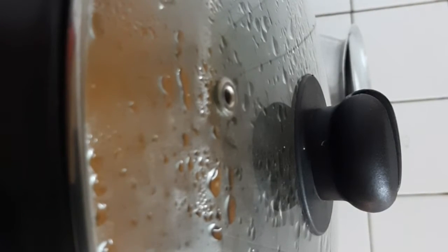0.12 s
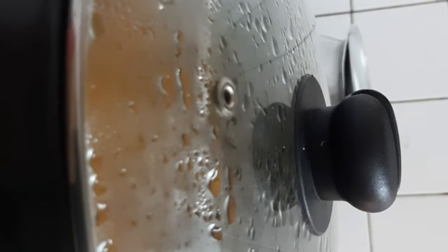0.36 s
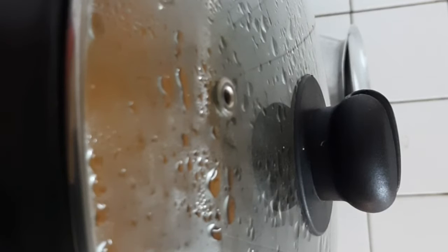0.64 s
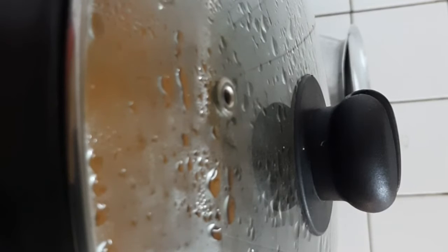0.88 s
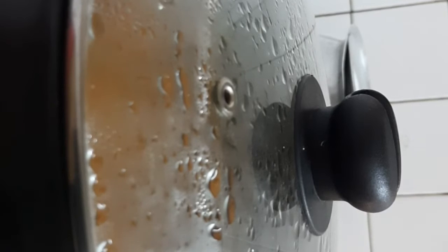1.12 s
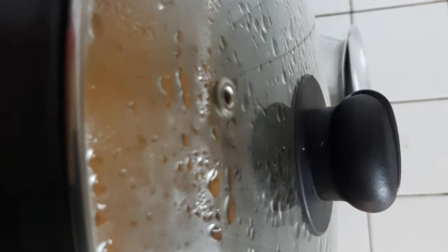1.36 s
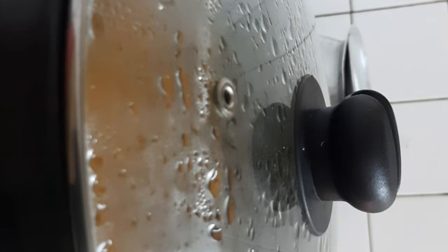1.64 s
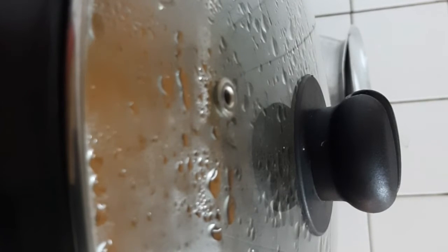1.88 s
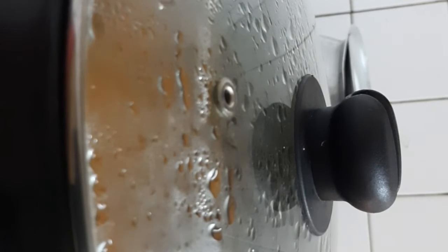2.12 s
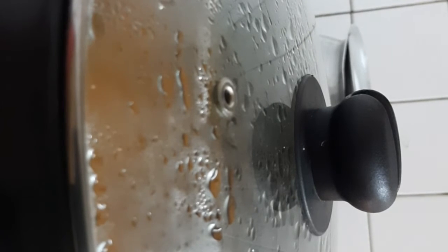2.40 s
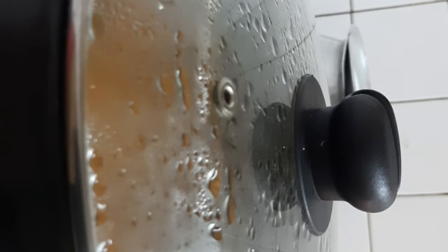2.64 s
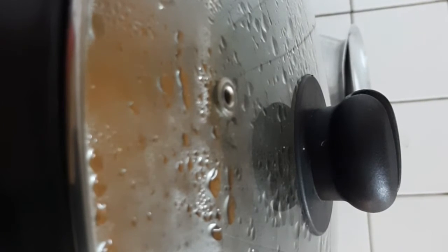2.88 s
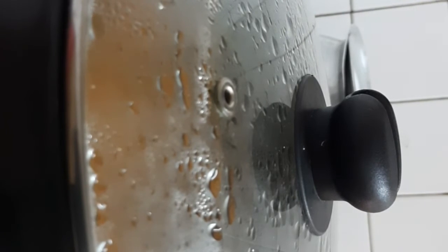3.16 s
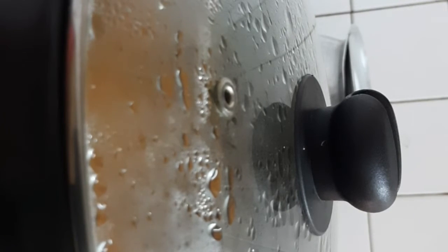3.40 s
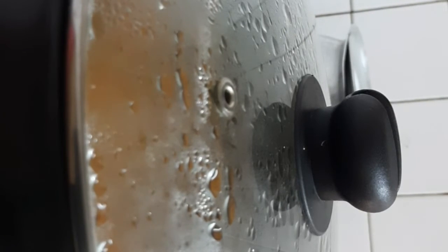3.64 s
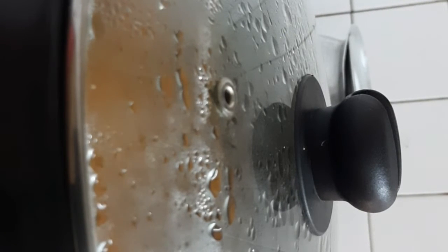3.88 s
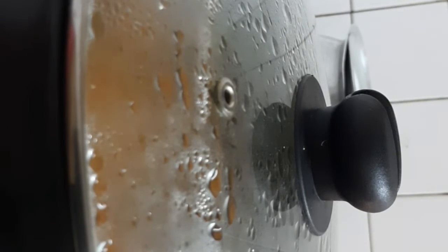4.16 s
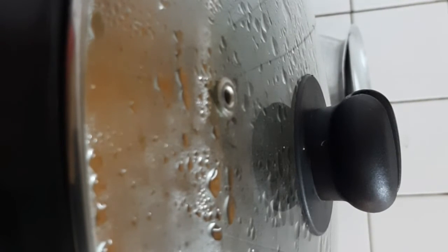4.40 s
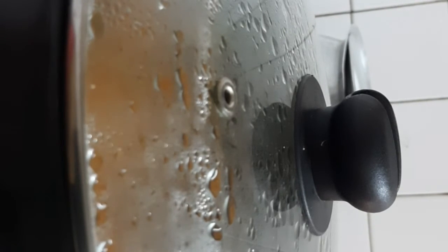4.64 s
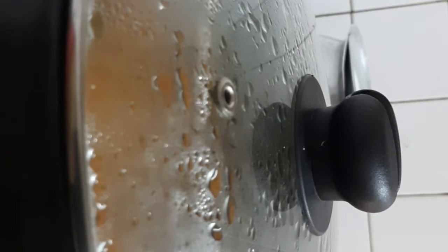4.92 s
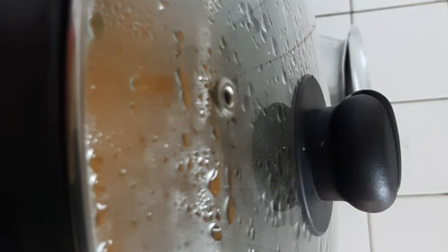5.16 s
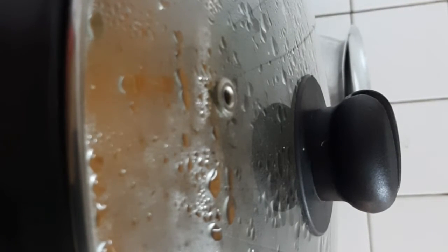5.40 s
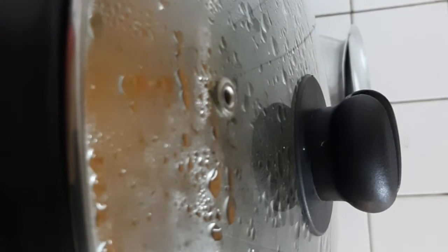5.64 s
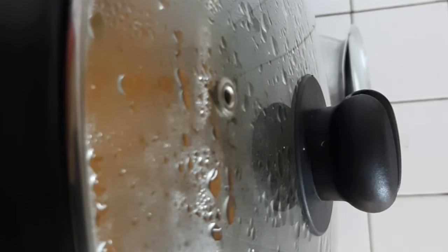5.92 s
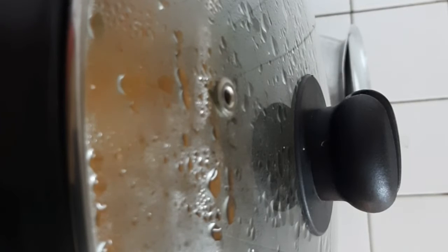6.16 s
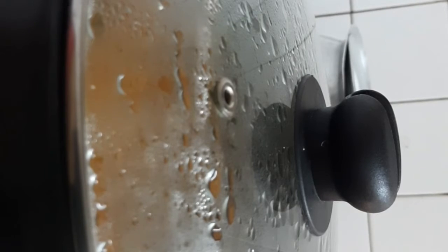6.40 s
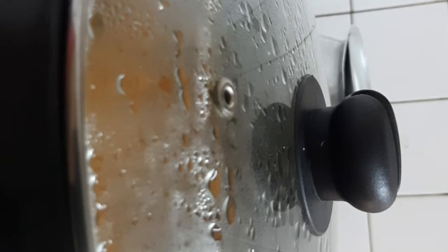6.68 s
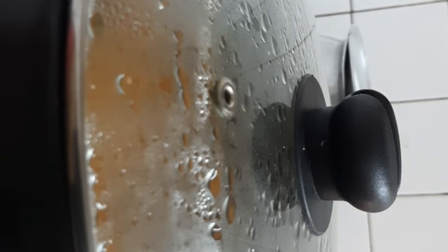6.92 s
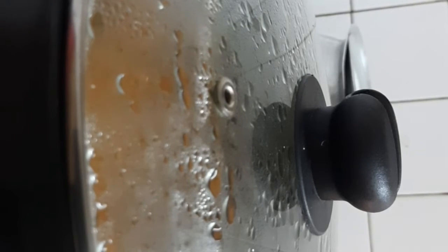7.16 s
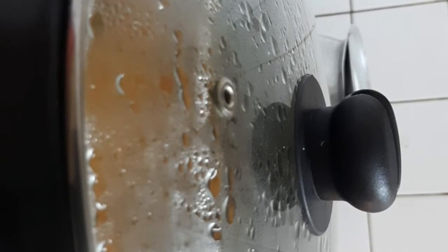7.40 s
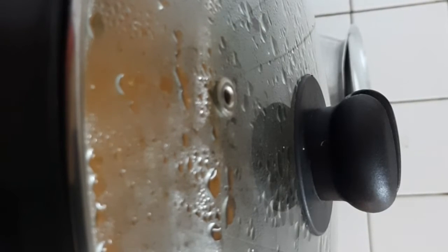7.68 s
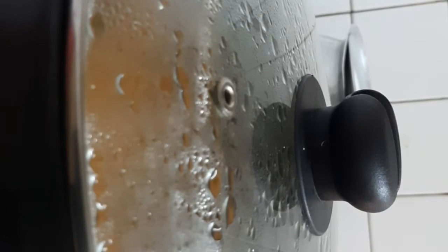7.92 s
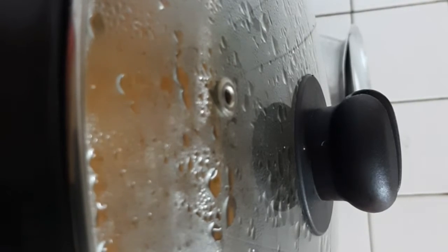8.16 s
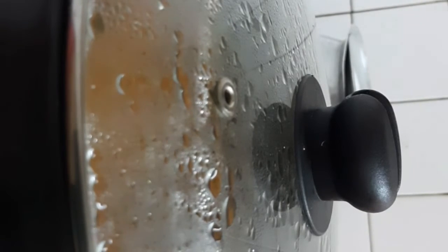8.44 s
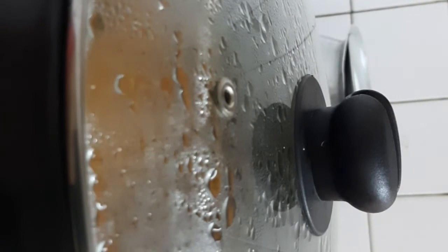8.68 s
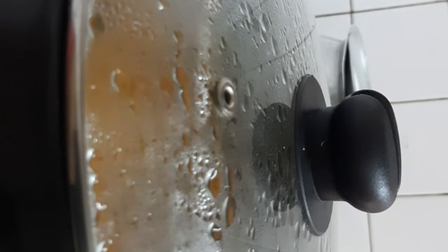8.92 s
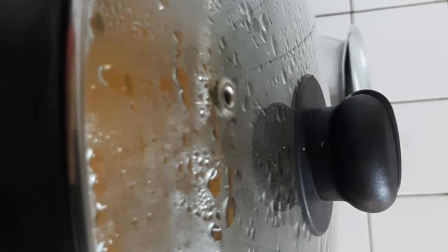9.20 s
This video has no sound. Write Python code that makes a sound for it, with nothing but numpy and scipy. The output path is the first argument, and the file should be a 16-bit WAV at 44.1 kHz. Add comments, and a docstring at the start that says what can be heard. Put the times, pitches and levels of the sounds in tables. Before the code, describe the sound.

Thick liquid bubbles softly under a glass lid in a humming kitchen; nearby cloth rustles lightly, and sharp little ticks and a knock come midway.

```python
"""A covered pan simmers on a stove in a small hard kitchen.
From the start appliances hum in wavering sines, noise rumbles in room and pan resonances, and the
simmer, coloured noise plus ringing bubbles, hushes under the glass lid over a faint microphone hiss.
After a second cloth close to the microphones rustles in swells of noise, pauses, and resumes past four.
Small ticks, filtered noise bursts, are thickest just around and after five seconds; two knocks ring."""
import sys
import numpy as np
from scipy import signal
from scipy.fft import rfft, irfft, next_fast_len
from scipy.io import wavfile

SR = 44100
rng = np.random.default_rng(int(sys.argv[2]) if len(sys.argv) > 2 else 0)


def materialize(psi):
    """Save the field psi as 16-bit PCM at rate SR to the path in sys.argv[1].

    A 1-D psi becomes a single channel; in a 2-D psi each row is a channel.
    """
    bounded = np.clip(np.atleast_2d(psi).T, -1, 1)
    quanta = np.round(bounded * 32767).astype(np.int16)
    wavfile.write(sys.argv[1], SR, quanta)


def magnitude_from_level(level_db):
    """Linear magnitude for a level in decibels (20 dB per decade)."""
    exponent = np.asarray(level_db, float) / 20
    return 10 ** exponent


N = 410571

# Colour of the simmer under the lid, for bed and bubbles. Each row: frequency in Hz, relative dB per Hz.
SIMMER_COLOUR = [(20, -26.5), (60, -2), (150, -10.5), (300, -19.5), (450, -20), (700, -21.5), (1000, -31),
                 (1500, -43.5), (1900, -44), (2600, -48.5), (3200, -57.5), (5000, -65), (16000, -85.5)]


def rms_one(x):
    """Scale to unit rms."""
    return x / np.sqrt(np.mean(x ** 2) + 1e-20)


def in_time(rows):
    """Columns of a table keyed by seconds, interpolated to every sample."""
    s, *columns = np.transpose(rows)
    return [np.interp(np.arange(N) / SR, s, c) for c in columns]


def at_hz(points, hz):
    """Spectrum points interpolated over log frequency."""
    point_hz, value = np.array(points).T
    return np.interp(np.log(hz), np.log(point_hz), value)


def drift(rate_hz):
    """Slow chance with spread 1: noise through a double pole at rate_hz, run every 40 samples."""
    hop, settle = 40, 4000
    r = np.exp(-2 * np.pi * rate_hz * hop / SR)
    noise = rng.standard_normal(N // hop + settle + 2)
    slow = signal.lfilter([1], [1, -2 * r, r * r], noise)[settle:]
    return np.interp(np.arange(N) / hop, np.arange(len(slow)), rms_one(slow - slow.mean()))


def sides(pan_db):
    """Left and right gains for a left-right difference."""
    return magnitude_from_level(np.array([pan_db, -pan_db]) / 2)


def room_noise(gain_at):
    """Stereo noise of a given colour, alike in the bass, nearly unrelated in the treble."""
    # Likeness of the ports. Each row: frequency in Hz, left-right correlation.
    likeness = [(60, 1), (99, 1), (160, 0.95), (270, 0.84), (450, 0.88), (740, -0.1), (1220, -0.021),
                (2010, 0.056), (3330, -0.034), (5500, -0.17), (9080, -0.036), (15000, -0.087)]
    # Tilt between the ports. Each row: frequency in Hz, left-right difference in dB.
    lean = [(60, -0.5), (92, 4.5), (140, -3.5), (210, 2), (330, 2), (500, -10.5), (770, 4), (1170, 0),
            (1790, -0.5), (2740, 2), (4190, -0.5), (6410, 1.5), (9810, -2.5), (15000, 5)]
    top_hz = 15740
    size = next_fast_len(N)
    hz = np.maximum(np.arange(size // 2 + 1) * SR / size, 1)
    mid, side = rfft(rng.standard_normal((2, size)))
    alike = np.clip(at_hz(likeness, hz), -1, 1)
    pair = np.sqrt(1 + alike) * mid + np.sqrt(1 - alike) * side * [[1], [-1]]
    gain = sides(at_hz(lean, hz)) * gain_at(hz) * (hz < top_hz)
    return irfft(pair * gain, size)[:, :N]


def patchy(x, depth_db, rate_hz):
    """Quarter-octave bands from 1 to 16 kHz, and all below and above, flicker separately at each port."""
    pad, size = 4096, next_fast_len(N + 8192)
    # mirrored ends keep the edges quiet
    spectrum = rfft(np.pad(x, ((0, 0), (pad, size - N - pad)), mode="reflect"))
    hz = np.arange(size // 2 + 1) * SR / size
    edges_hz = np.r_[0, 1000 * 2 ** np.arange(0, 4.1, .25), SR]
    out = 0
    for low, high in zip(edges_hz, edges_hz[1:]):
        band = irfft(spectrum * ((hz >= low) & (hz < high)), size)[:, pad:pad + N]
        flicker = np.array([drift(rate_hz), drift(rate_hz)])
        out = out + band * magnitude_from_level(depth_db * flicker)
    return out


def hum():
    """Steady appliance tones whose pitch and level waver a little."""
    # Pitch of each tone in Hz.
    tone_hz = [100.3, 127.9, 199.9, 236.2, 269.2, 300.1, 367.4, 377.5]
    # The same tones. Each row: mean level in dB rms, left-right difference in dB.
    tone_levels = [(-37, -2), (-45, -2.5), (-62.5, 2), (-60, 2.5), (-52.5, -1.7), (-66, -1), (-63.5, -1.5),
                   (-68.5, 0.5)]
    out = 0
    for hz, (level_db, pan_db) in zip(tone_hz, tone_levels):
        wavering_hz = hz * (1 + .0006 * drift(.5))
        phase = 2 * np.pi * np.cumsum(wavering_hz) / SR + rng.uniform(0, 2 * np.pi)
        tone = np.sqrt(2) * magnitude_from_level(level_db + .7 * drift(0.89)) * np.sin(phase)
        out = out + sides(pan_db)[:, None] * tone
    return out


def rumble():
    """Noise in narrow steep resonances: the deep is uneven, the middle wanders partly with it, the top is steady."""
    # Room and pan resonances: centres in Hz.
    mode_hz = [33, 44.5, 49, 56.5, 63, 74, 83, 107, 114, 124, 134, 158, 181, 196, 212, 228, 240, 254, 290,
               318, 333, 353, 390, 423, 540, 573, 689, 817, 932, 1044, 1160, 1750]
    # The same resonances. Each row: width at -6 dB in Hz, relative peak in dB per Hz.
    mode_shapes = [(2.7, -65.5), (5.8, -53), (2.78, -53.5), (1.5, -61), (3.8, -53), (4.96, -60.5),
                   (4.02, -56), (8.5, -56), (4.9, -48), (5.3, -57.5), (5.9, -65.5), (9.2593, -63),
                   (6.8, -66.5), (8.54, -67.5), (10.2, -73.5), (5.93, -78.5), (7.95, -65.5), (8.1, -71.5),
                   (14, -74), (10.1, -70.5), (4.4, -75.5), (11.7, -70), (13.9, -76), (15.8, -78),
                   (33, -81.5), (7.4, -74), (44, -81.5), (21, -94.5), (27, -94), (13, -86), (71, -95),
                   (130, -105)]
    # Slow swells in the level of the deep noise. Each row: time in seconds, level in dB rms.
    deep_level = [(0.0, -33), (0.3, -41), (1.5, -40.5), (3.2, -43.5), (4.7, -39), (5.4, -41.5),
                  (6.05, -36.5), (6.7, -41), (7.03, -33.5), (7.5, -45), (8.5, -40), (9.31, -40)]
    low_split_hz, high_split_hz = 90, 140
    middle_db, middle_share = -40.5, .3   # mean level in dB, share of the deep wandering

    def ringing(low_hz, high_hz):
        modes = [(f, *shape) for f, shape in zip(mode_hz, mode_shapes) if low_hz <= f < high_hz]

        def gain_at(hz):
            power = sum(magnitude_from_level(2 * db) / (1 + (2 * (hz - f) / width) ** 2) ** 2 for f, width, db in modes)
            return np.sqrt(SR / 2 * power)
        return room_noise(gain_at)

    deep_db, = in_time(deep_level)
    middle_db = middle_db + middle_share * (deep_db - deep_db.mean())
    deep = rms_one(ringing(0, low_split_hz)) * magnitude_from_level(deep_db)
    middle = rms_one(ringing(low_split_hz, high_split_hz)) * magnitude_from_level(middle_db)
    return deep + middle + ringing(high_split_hz, SR)


def bubbles():
    """Bubbles burst at random in the thick liquid and ring briefly, coloured like the simmer; unit rms."""
    bubbles_per_s, ring_cycles, pitches = 900, 30., 30   # rate before its drift, cycles to -60 dB
    born = rng.random(N) < bubbles_per_s * magnitude_from_level(3 * drift(4)) / SR
    strength = magnitude_from_level(2.5 * np.minimum(rng.exponential(1, N), 5))
    bursts = born * strength * rng.choice([-1, 1], N) + 1e-18
    dealt, out = rng.integers(0, pitches, N), 0
    for k, hz in enumerate(np.geomspace(200, 3200, num=pitches)):
        r, w = magnitude_from_level(-60 * hz / (ring_cycles * SR)), 2 * np.pi * hz / SR
        rings = signal.lfilter([0, np.sin(w)], [1, -2 * r * np.cos(w), r * r], bursts * (dealt == k))
        # each spot of the pan lies nearer one port
        other_port = np.roll(rings, round(rng.uniform(-0.00088, .001) * SR))
        level = magnitude_from_level(at_hz(SIMMER_COLOUR, hz)) * np.sqrt(hz)
        out = out + level * np.array([rms_one(rings), rms_one(other_port)])
    return rms_one(out)


def simmer():
    """Coloured noise and bubbles under the lid, flickering band by band and swelling gently."""
    # Swell, used about its mean. Each row: time in seconds, level in dB.
    simmer_swell = [(0.0, -55), (2.3, -54.5), (2.8, -56), (3.7, -54), (4.4, -56.5), (4.8, -52.5),
                    (5.6, -55), (6.65, -52), (7.05, -55), (9.31, -56)]
    bed_db, bubbles_over_bed_db = -46.5, -10
    bed = rms_one(room_noise(lambda hz: magnitude_from_level(at_hz(SIMMER_COLOUR, hz))))
    mix = magnitude_from_level(bed_db) * patchy(bed + magnitude_from_level(bubbles_over_bed_db) * bubbles(), depth_db=1.0, rate_hz=2.7)
    swell_db, = in_time(simmer_swell)
    return mix * magnitude_from_level(swell_db - swell_db.mean() + .5 * drift(9.9))


def microphone_hiss():
    """Smooth steady noise above 1 kHz with the colour of the microphone ports."""
    # Each row: frequency in Hz, relative dB per Hz.
    hiss_colour = [(1000, -3), (4000, -2.5), (6900, -4.5), (7700, 1.5), (8500, -5.5), (9500, -10),
                   (11000, -8.5), (12500, -2), (15000, -3), (16000, 6.5)]
    level_db = -76
    return magnitude_from_level(level_db) * rms_one(room_noise(lambda hz: magnitude_from_level(at_hz(hiss_colour, hz)) * (hz > 1000)))


def stroke_gains():
    """One rounded swell stretched to each stroke's length, powers adding: gains of rustle, body, sheen."""
    # Each row: crest in seconds, length in seconds, rustle level in dB, body and sheen in dB above it.
    cloth_strokes = [(1.378, 0.1, -72, -3, -6.5), (1.498, .13, -64.5, -6, -7),
                     (1.754, 0.21, -60.5, -3.5, -2.5), (2.007, .14, -67, -6.5, -4.5),
                     (2.304, 0.33, -77.5, -3, -7), (4.22, 0.13, -66, 3, -5),
                     (4.488, 0.27, -64.5, 2.5, -10.5), (4.684, .1, -71, 2.5, -8),
                     (4.833, .26, -64.5, 2, -1.5), (5.08, 0.26, -65, 2.5, -4.5), (5.39, .12, -74.5, 5.5, 2),
                     (6.02, .3, -79.5, 5, -5.5), (6.466, .14, -66.5, 0, -6.5),
                     (6.634, 0.2, -60.5, 4.5, -1.5), (6.921, 0.31, -73.5, 2.5, -9),
                     (7.225, 0.24, -71, 2, -2.5), (7.385, .2, -66.5, -0.5, -5),
                     (7.609, .15, -76.5, 12.5, -5.5), (7.76, .1, -73, 1.5, -9), (8.00, 0.24, -69, 2.5, -6),
                     (8.22, 0.25, -78.5, 6.5, -4.5), (8.474, .3, -75.5, 4, -9),
                     (8.765, 0.22, -70, 3.5, -6.5), (8.941, .15, -76.5, 1.5, -9),
                     (9.124, 0.29, -76.5, 7, -6)]
    rest_db = (-85.5, -76.5, -85.5)   # cloth at rest: rustle, body, sheen
    rise_share, edge_drop_db, squareness = 0.5, 6, 1.9   # rise as share of length, drop at both ends
    t = np.arange(0, N, 64) / SR
    power = magnitude_from_level(2 * np.array(rest_db))[:, None]
    for crest_s, length_s, level_db, body_db, sheen_db in cloth_strokes:
        flank_s = length_s * np.where(t < crest_s, rise_share, 1 - rise_share)
        away = np.abs(t - crest_s) / flank_s
        swell_db = level_db - np.minimum(edge_drop_db * away ** squareness, 80)
        power = power + magnitude_from_level(2 * (swell_db + np.array([[0], [body_db], [sheen_db]])))
    return [np.interp(np.arange(N) / SR, t, np.sqrt(p)) for p in power]


def rustle():
    """Sliding fibres as three colours of noise that share one flutter and add their own."""
    # Colours of the cloth. Each row of the three: frequency in Hz, relative dB per Hz.
    main_colour = [(2800, -24.5), (4000, -6.5), (5500, -3), (8000, 0), (9500, -4.5), (10500, -20.5)]
    body_colour = [(400, 0.5), (700, -2.5), (1250, 6), (1500, -0.5), (1800, -0.5), (2300, -7.5), (3500, -9),
                   (4500, -19)]
    sheen_colour = [(9000, -20.5), (10500, -5.5), (12500, 0), (14000, -3), (16000, -6.5)]
    # Where the cloth moves. Each row: time in seconds, left-right difference in dB.
    cloth_side = [(0, 1.5), (1.5, -3.5), (1.9, 3.5), (4.4, 0.5), (4.85, 3), (5.2, -2.5), (6.5, 2.5),
                  (7.1, -1), (7.4, -6), (7.7, -2), (8.0, -7), (8.3, -2), (8.76, -4), (9.0, 2), (9.31, -2)]
    pan_db, = in_time(cloth_side)
    out, flutter_db = 0, 0.38 * drift(27)
    for colour, gain in zip((main_colour, body_colour, sheen_colour), stroke_gains()):
        noise = room_noise(lambda hz: magnitude_from_level(at_hz(colour, hz)) * (hz > 400))
        out = out + rms_one(noise) * gain * magnitude_from_level(flutter_db + 0.72 * drift(31))
    return patchy(out, depth_db=2.0, rate_hz=4.4) * sides(pan_db)


def placed(sound, start_s, peak_db, pan_db):
    """Set one short sound in silence, a second longer than the scene, later at the farther left port."""
    left_lag_s = .0003
    sound = sound * magnitude_from_level(peak_db) / np.abs(sound).max(axis=1, keepdims=True) * sides(pan_db)[:, None]
    out = np.zeros((2, N + SR))
    for side, lag_s in enumerate((left_lag_s, 0)):
        at = round((start_s + lag_s) * SR)
        out[side, at:at + sound.shape[1]] += sound[side]
    return out


def ticks():
    """Each tick is a noise burst of a few cycles in a band of its own."""
    # Each row: start in seconds, peak in dB, low and high band edge in Hz, left-right difference in dB.
    tick_list = [(1.477, -45, 7500, 11000, -11), (4.9863, -27, 9470, 16200, -9),
                 (4.9923, -28.5, 4840, 11200, -1), (5.0012, -51, 3500, 5500, -4),
                 (5.012, -38, 8000, 16100, -7.5), (5.071, -46, 7000, 13000, -5),
                 (5.1875, -50, 8000, 11000, -6), (5.2063, -40.5, 3500, 12000, -6),
                 (5.2306, -48, 6000, 11000, -6), (5.3430, -49, 8000, 9500, -17),
                 (6.0054, -51.5, 3500, 9900, -2), (6.1515, -54, 5960, 14100, -4),
                 (6.4389, -47, 6000, 9500, 1), (6.807, -54, 6000, 6660, 1), (6.8554, -53, 5760, 6800, -2),
                 (7.4237, -51, 4900, 5550, -4), (7.5724, -53, 1200, 3160, -9),
                 (8.9304, -48.5, 3000, 9000, 2), (9.082, -53, 1300, 8500, 3), (9.248, -64, 3730, 4800, 0)]
    decay_cycles = 3.0   # time constant, in cycles of the band's middle
    t, out = np.arange(1500) / SR, 0
    for start_s, peak_db, low_hz, high_hz, pan_db in tick_list:
        decay = np.exp(-t * np.sqrt(low_hz * high_hz) / decay_cycles)
        burst = rng.standard_normal((2, len(t))) * decay + 1e-18
        burst[0, 0] = 1.8   # a sharp front keeps the colour even
        # the two ports hear it a little differently
        pair = burst[0] + .5 * burst[1] * np.array([[1], [-1]])
        band = signal.butter(3, [low_hz, high_hz], "band", fs=SR, output="sos")
        out = out + placed(signal.sosfilt(band, pair), start_s, peak_db, pan_db)
    return out


def knocks():
    """Something small and hard is knocked; each knock rings the same decaying modes."""
    # Each row: start in seconds, peak in dB.
    knock_list = [(5.3477, -29), (5.4162, -54.5)]
    # Each row: frequency in Hz, mean relative level in dB, t60 in seconds.
    knock_modes = [(2700, -11, 0.0091), (3550, 0, 0.0098), (4000, -4.5, 0.012), (4900, -10.5, .008),
                   (5900, -16, .006), (7850, -3, 0.0076), (8860, -4, 0.0081), (12300, -6, .005),
                   (13340, -3, .005), (14700, -9.5, .004), (15700, -9.5, .004)]
    pan_db, attack_s = -6.5, 0.00027
    t, out = np.arange(1500) / SR, 0
    for start_s, peak_db in knock_list:
        ringing = 0
        for hz, db, t60_s in knock_modes:
            envelope = magnitude_from_level(db + rng.normal(0, 1.7, (2, 1)) - 60 * t / t60_s)
            ringing = ringing + envelope * np.sin(2 * np.pi * hz * t + rng.uniform(0, 2 * np.pi))
        out = out + placed(ringing * (1 - np.exp(-t / attack_s)), start_s, peak_db, pan_db)
    return out


def off_tiles(dry_hits):
    """Adds the scatter off the tiles: a decaying noise tail, dulled as walls swallow the treble."""
    tail_db, t60_s, gap_s = -17.5, .28, .008
    t = np.arange(SR // 2) / SR
    tail = rng.standard_normal((2, len(t))) * magnitude_from_level(-60 * t / t60_s) * (t > gap_s)
    tail = signal.lfilter([.4], [1, -.6], tail)
    tail = tail / np.sqrt((tail ** 2).sum(axis=1, keepdims=True))
    wet = signal.fftconvolve(dry_hits, tail, axes=1)
    return dry_hits[:, :N] + magnitude_from_level(tail_db) * wet[:, :N]


def scene():
    """All layers summed."""
    return hum() + rumble() + simmer() + microphone_hiss() + rustle() + off_tiles(ticks() + knocks())


def top_cut(x):
    """Nothing passes above the cut-off."""
    return signal.sosfilt(signal.butter(12, 16500, fs=SR, output="sos"), x)


def record(dry):
    """Stores the finished mix."""
    return top_cut(dry)


dry = scene()
out = record(dry)
materialize(out)
```